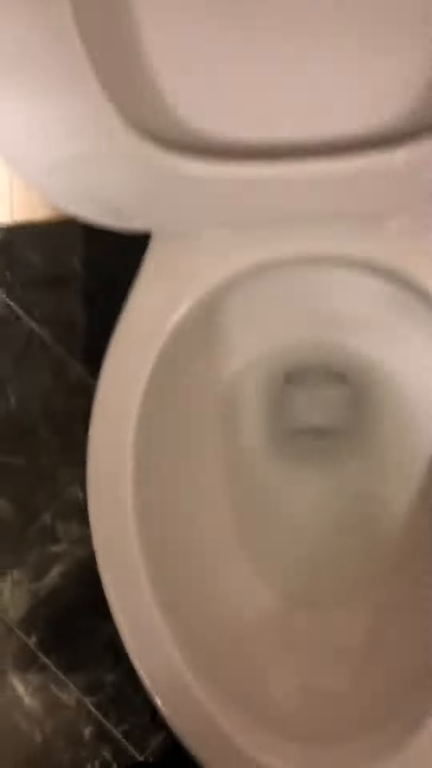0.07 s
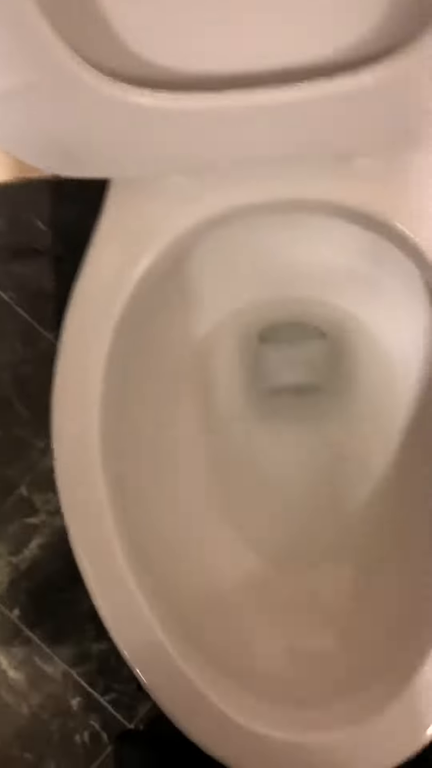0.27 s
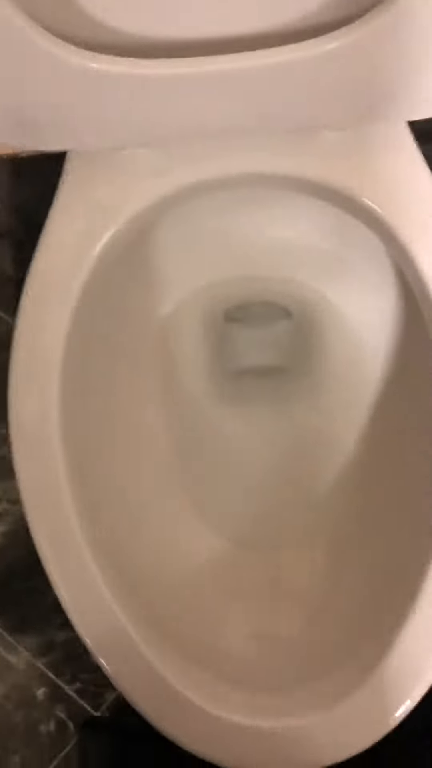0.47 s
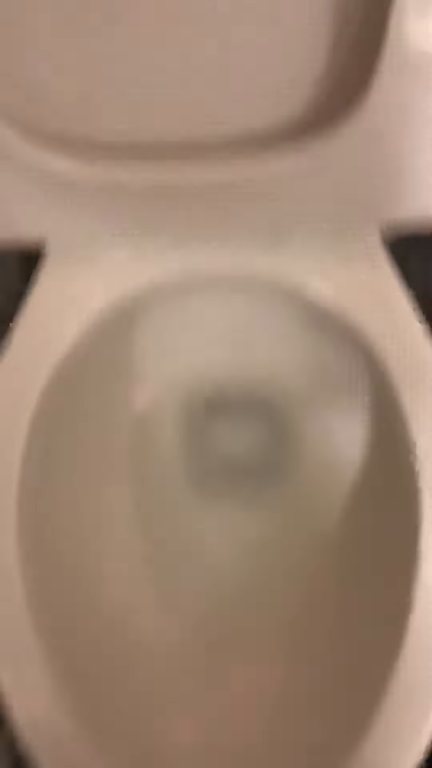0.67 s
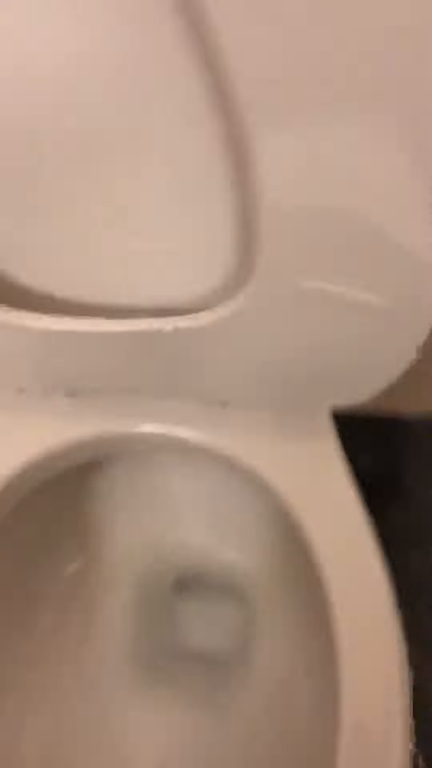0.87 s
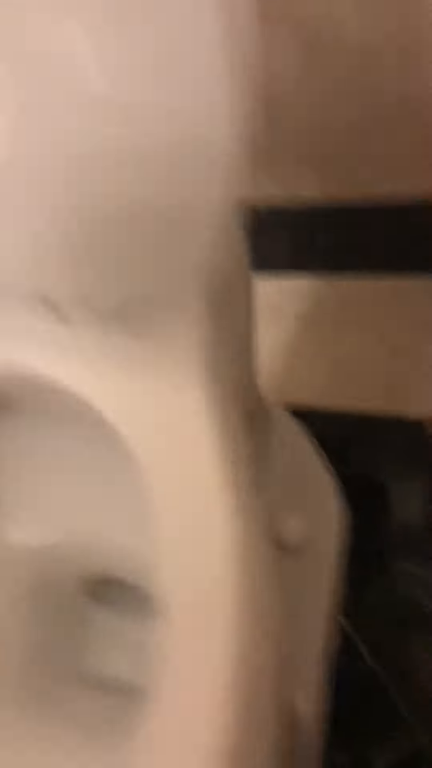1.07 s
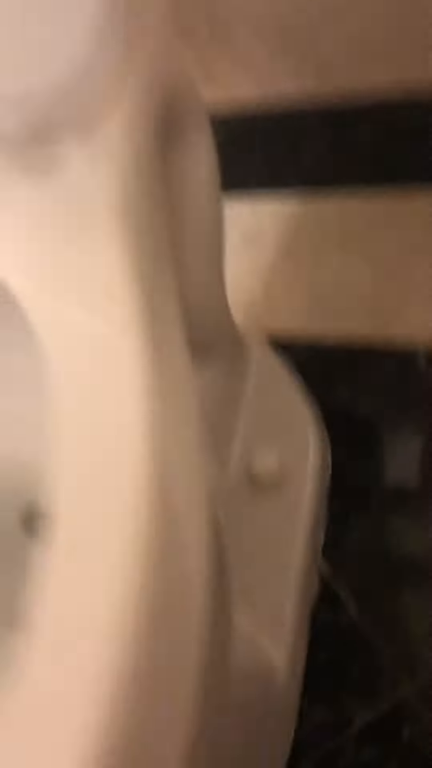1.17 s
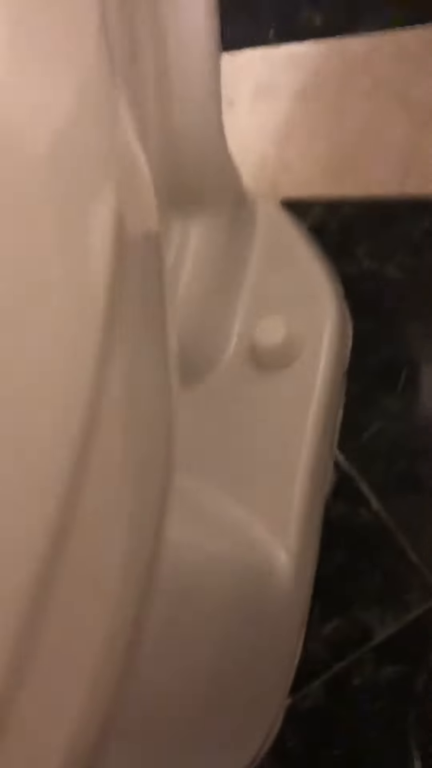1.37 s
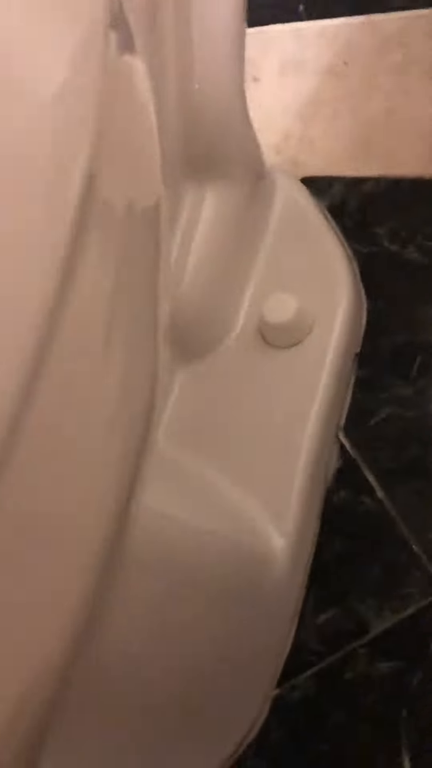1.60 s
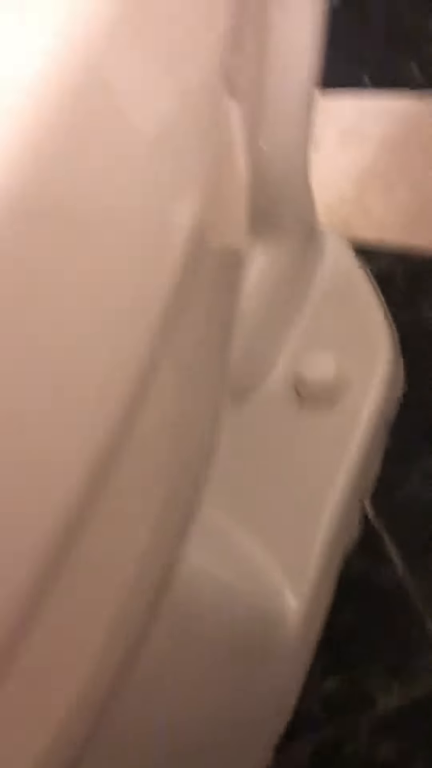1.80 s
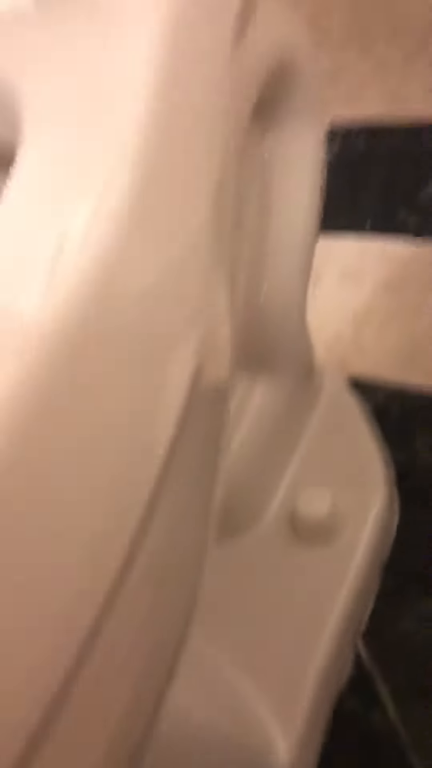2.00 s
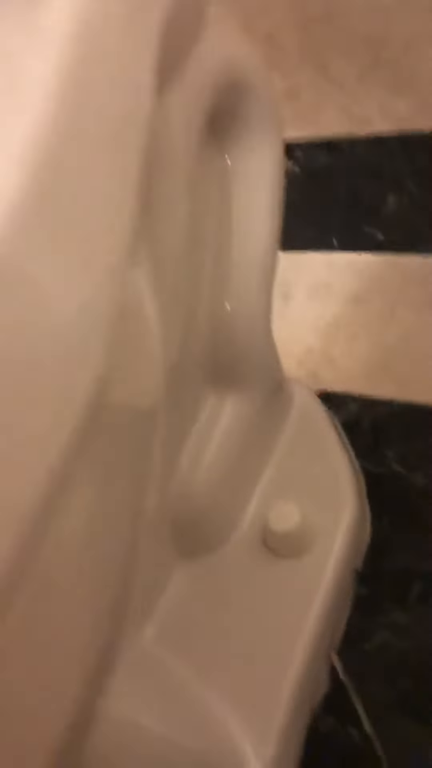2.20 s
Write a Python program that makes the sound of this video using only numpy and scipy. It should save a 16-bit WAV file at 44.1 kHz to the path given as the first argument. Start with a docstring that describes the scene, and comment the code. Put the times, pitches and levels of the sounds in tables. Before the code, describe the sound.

Sharp bang of a toilet lid and seat hitting the tank in a small bathroom.

```python
"""A raised toilet lid knocks against the tank in a small tiled restroom; the seat slaps against it and
bounces to rest. Each impact gives a burst of noise and excites damped modes, so lid, tank and room
boom briefly. The hinge ticks once. Then friction of clothing and of the hand on the microphone makes
a soft rustle over the low rumble and hiss of ventilation."""
import sys
import numpy as np
from scipy import signal
from scipy.io import wavfile

SR = 44100
rng = np.random.default_rng(int(sys.argv[2]) if len(sys.argv) > 2 else 0)


def master(y):
    """Save y as 16-bit WAV."""
    cut = np.clip(np.atleast_2d(y).T, -1, 1)
    pcm = np.round(cut * 32767)  # scale
    wavfile.write(sys.argv[1], SR, pcm.astype(np.int16))


N = 99225
TIME = np.arange(N) / SR

# Modes of the lid. Each row: frequency in Hz, relative level in dB, time to fall 60 dB (T60) in seconds.
LID_MODES = [(388, 2, 0.057), (592, -7.5, 0.044), (717, -3.5, 0.07), (890, -3.5, 0.08), (1056, -7.5, 0.063),
             (1310, -12, 0.076), (1608, 0, 0.029), (2900, -7.5, 0.021), (4010, -8, 0.018),
             (4940, -8.5, 0.016)]
# Contact noise. Each row: frequency in Hz, relative spectral density in dB.
CRACK_SPECTRUM = [(100, 2), (400, 0.5), (1500, -4.5), (2500, -7), (5000, -16), (8000, -15), (11000, -29),
                  (16000, -44)]
KNOCK_S = .2485


def lid_knock():
    """Impact excitation: one hard contact rings the lid and sends out a crack that the tiles reflect."""
    direct = decay(KNOCK_S, t60=0.052)
    crack = sum(band * (direct + from_db(-13.5) * reverberation(KNOCK_S, hz))
                for hz, band in noise_bands(CRACK_SPECTRUM))
    return from_db(-18.5) * ring(KNOCK_S, LID_MODES) + from_db(-26) * crack


# Bounces of the seat. Each row: time in seconds, clack, thump and boom gains in dB, treble cutoff in Hz.
SLAPS = [(0.2594, -19, -21, -33, 14600), (0.328, -27, -23, -42.5, 10400), (0.4076, -35, -28.5, -45, 5560),
         (0.4952, -42, -35, -49.5, 3900)]
# Clack of the plastic. Each row: frequency in Hz, relative spectral density in dB.
CLACK_SPECTRUM = [(200, 4.5), (350, 3.5), (520, 4), (1300, 0), (1900, -1.5), (2700, 0), (3400, -3),
                  (4200, -0.5), (5600, -2), (7800, -2.5), (10000, -12), (16000, -19)]
# The seat's ring and its hollow thump. Each row: frequency in Hz, relative level in dB, T60 in seconds.
SEAT_MODES = [(1053, -10, 0.048), (1312, -7.5, 0.06), (1540, -20, .06), (2570, -22, 0.22),
              (4174, -7.5, 0.037), (4300, -21, .14)]
THUMP_MODES = [(301, 0, 0.051), (364, -2.5, 0.047)]


def seat_slaps():
    """Inelastic rebound: each slap repeats one clack, ring and thump, softer and duller than the last."""
    half_rise_s = .0016
    peak_s = 2 * half_rise_s
    direct = TIME / peak_s * (TIME < peak_s) + decay(peak_s, t60=0.024)
    clack = sum(band * (direct + from_db(-12.5) * reverberation(peak_s, hz))
                for hz, band in noise_bands(CLACK_SPECTRUM))
    slap = clack + from_db(-4) * ring(half_rise_s, SEAT_MODES)
    out = np.zeros(N)
    for start, clack_db, thump_db, _, cutoff_hz in SLAPS:
        first = int((start - half_rise_s) * SR)
        lowpass = signal.butter(2, cutoff_hz, fs=SR, output="sos")
        out[first:] += from_db(clack_db) * signal.sosfilt(lowpass, slap)[:N - first]
        out += from_db(thump_db) * ring(start, THUMP_MODES, build_cycles=0.61)
    return out


# Low modes of fixture and room. Each row: frequency in Hz, relative level in dB, T60 in seconds.
BOOM_MODES = [(62.5, -10, 1.74), (88.9, -7, 0.63), (115, -3.5, 0.41), (136.7, -1, 0.68),
              (160.36, 0.5, 0.58), (186.2, 1, 0.2), (206, -4.5, 0.86), (342.4, -5, 0.57), (424.7, -4, 0.42),
              (484, -11.5, .35), (565, -9, 0.24), (672, -13.5, 0.22), (729, -18, .25), (924, -13, .24)]
# Diffuse bass of the room. Each row: frequency in Hz, relative spectral density in dB.
BASS_SPECTRUM = [(30, -28), (58, 0.5), (85, -4.5), (135, 0.5), (175, -5.5), (235, -27), (380, -12),
                 (520, -30), (2000, -51)]


def room_boom():
    """Resonance: every blow feeds the low modes; diffuse bass lingers, the deepest swelling last."""
    blows = [(KNOCK_S, -29.5)] + [(start, boom_db) for start, _, _, boom_db, _ in SLAPS]
    modes = sum(from_db(db) * ring(start, BOOM_MODES, build_cycles=0.67) for start, db in blows)
    bass = sum(band * build_up(KNOCK_S, hz, cycles=7.3) * reverberation(KNOCK_S, hz)
               for hz, band in noise_bands(BASS_SPECTRUM))
    return modes + from_db(-30.5) * bass


# Reverberation time of the room. Each row: frequency in Hz, T60 in seconds.
ROOM_T60 = [(60, 1.53), (110, 0.86), (200, 0.75), (400, 0.39), (1000, 0.25), (3000, 0.36), (7500, .28),
            (15000, 0.24)]


def reverberation(start, hz):
    """Absorption: the envelope of one band of reflected sound dies away, most slowly in the bass."""
    return decay(start, at_hz(ROOM_T60, hz))


# Tick of the hinge. Each row: frequency in Hz, relative spectral density in dB.
TICK_SPECTRUM = [(2000, -30), (6000, -14), (8000, 2), (10500, 0), (13000, -15), (16000, -22)]


def hinge_tick():
    """A damped transient: the hinge settles with one faint burst of treble noise."""
    return from_db(-50) * decay(start=.558, t60=0.018) * noise(TICK_SPECTRUM)


# Soft rubbing, bright swish of cloth and dull handling. Each row: time in seconds, gain in dB.
RUB_LEVELS = [(0, -54.5), (.06, -54), (.17, -59.5), (.5, -62), (.66, -50.5), (.8, -50), (1.02, -48.5),
              (1.18, -48.5), (1.27, -50.5), (1.46, -45), (1.56, -49), (1.72, -55), (1.95, -55),
              (2.08, -60.5), (2.25, -62)]
SWISH_LEVELS = [(0, -53.5), (.07, -58), (.2, -66), (.52, -73), (.6, -57.5), (.72, -50.5), (.88, -46),
                (1.05, -51.5), (1.28, -55.5), (1.45, -49.5), (1.72, -59.5), (1.95, -61), (2.17, -66.5),
                (2.25, -64)]
HANDLING_LEVELS = [(0, -59.5), (.2, -65), (.8, -63), (.9, -57), (1.02, -54), (1.25, -54), (1.45, -54),
                   (1.58, -57.5), (1.92, -55), (2.15, -62), (2.25, -58)]
# Timbres of the same three. Each row: frequency in Hz, relative spectral density in dB.
RUB_SPECTRUM = [(150, -2.5), (500, 1), (1000, 3), (2000, 0.5), (2700, -2), (4000, 0), (7500, -5),
                (10000, -14.5), (16000, -27.5)]
SWISH_SPECTRUM = [(500, -33), (2000, -8), (4500, -5.5), (8000, -3), (12000, -3.5), (16000, -6)]
HANDLING_SPECTRUM = [(40, -21), (110, 7), (170, -5), (220, -6.5), (280, -6), (330, 0.5), (500, -5),
                     (1000, -22), (4000, -49)]
# Hollow resonances stirred by handling. Each row: centre in Hz, bandwidth in Hz, relative level in dB.
HOLLOWS = [(214.2, 11.4, -7.5), (271.6, 13, -6)]


def rustle():
    """Friction noise: cloth and hand slide close to the microphone, swelling and fading smoothly."""
    handling = noise(HANDLING_SPECTRUM)
    handling += sum(from_db(db) * resonant_noise(hz, width_hz) for hz, width_hz, db in HOLLOWS)
    rub = envelope(RUB_LEVELS) * noise(RUB_SPECTRUM)
    swish = envelope(SWISH_LEVELS) * noise(SWISH_SPECTRUM)
    return rub + swish + envelope(HANDLING_LEVELS) * handling


# Background of the ventilation. Each row: frequency in Hz, relative spectral density in dB.
VENTILATION_SPECTRUM = [(25, -35), (45, -3.5), (64, 5.5), (90, -7.5), (150, -9.5), (300, -18.5),
                        (1000, -18.5), (4000, -29.5), (16000, -52)]


def ventilation():
    """Stationary noise: a low rumble and hiss at constant level."""
    return from_db(-56.5) * noise(VENTILATION_SPECTRUM)


def ring(start, modes, build_cycles=0.075):
    """Modal superposition: damped sinusoids of alternating sign, struck together."""
    age = np.maximum(TIME - start, 0)
    out = np.zeros(N)
    for k, (hz, db, t60) in enumerate(modes):
        amplitude = from_db(db) * build_up(start, hz, build_cycles) * decay(start, t60)
        out += (-1) ** k * amplitude * np.sin(2 * np.pi * hz * age)
    return out


def build_up(start, hz, cycles):
    """Exponential growth towards 1, with a time constant counted in cycles."""
    return 1 - np.exp(-np.maximum(TIME - start, 0) * hz / cycles)


def decay(start, t60):
    """Exponential damping: zero before the start, then falling 60 dB every t60 seconds."""
    return (TIME >= start) * np.exp(-np.log(1000) * np.maximum(TIME - start, 0) / t60)


def noise_bands(spectrum):
    """Third-octave analysis of coloured noise: (centre in Hz, samples) pairs whose powers sum to 1."""
    edges = np.geomspace(25, 18000, 29)
    centres = np.sqrt(edges[1:] * edges[:-1])
    white = rng.standard_normal((2, N))  # neighbouring bands draw on independent noise
    gains = from_db(at_hz(spectrum, centres)) * np.sqrt(np.diff(edges))
    bands = []
    for k, gain in enumerate(gains / np.linalg.norm(gains)):
        bandpass = signal.butter(2, edges[k:k + 2], "band", fs=SR, output="sos")
        band = signal.sosfilt(bandpass, white[k % 2])
        bands.append((centres[k], gain * band / band.std()))
    return bands


def noise(spectrum):
    """Incoherent addition: the bands sum to steady noise of rms near 1."""
    return sum(band for _, band in noise_bands(spectrum))


def resonant_noise(hz, width_hz):
    """Forced response of one narrow resonance to white noise, at rms 1."""
    response = signal.lfilter(*signal.iirpeak(hz, hz / width_hz, fs=SR), rng.standard_normal(N))
    return response / response.std()


def envelope(points):
    """Amplitude over time, interpolated in decibels."""
    return from_db(np.interp(TIME, *np.transpose(points)))


def at_hz(points, hz):
    """Interpolation on a logarithmic frequency axis."""
    frequencies, values = np.transpose(points)
    return np.interp(np.log(hz), np.log(frequencies), values)


def from_db(db):
    """Amplitude ratio of a level in decibels."""
    return 10 ** (np.asarray(db) / 20)


def scene():
    """Superposition: all sources add, alike in both channels."""
    mono = lid_knock() + seat_slaps() + room_boom() + hinge_tick() + rustle() + ventilation()
    return np.array([mono, mono])


def record(dry):
    """Band limiting and saturation: the microphone loses deep bass and top treble and rounds peaks."""
    low_cut_hz, high_cut_hz, ceiling = 47, 16000, .3
    thin = signal.sosfilt(signal.butter(3, low_cut_hz, "high", fs=SR, output="sos"), dry)
    rounded = thin / (1 + (thin / ceiling) ** 4) ** (1 / 4)
    return signal.sosfilt(signal.ellip(12, .1, 80, high_cut_hz, fs=SR, output="sos"), rounded)


dry = scene()
out = record(dry)
master(out)
```